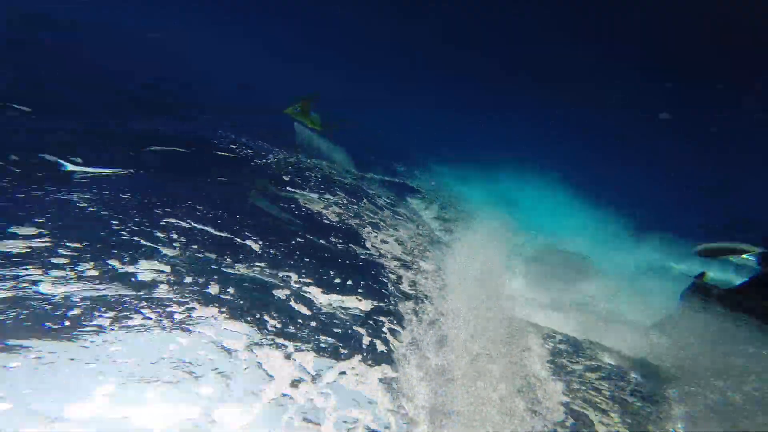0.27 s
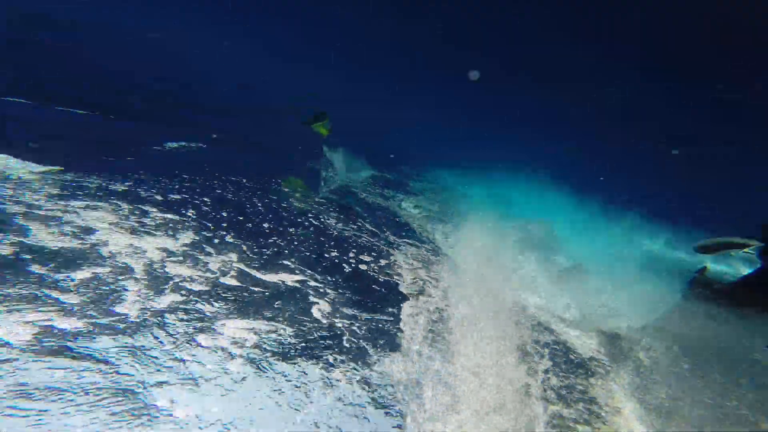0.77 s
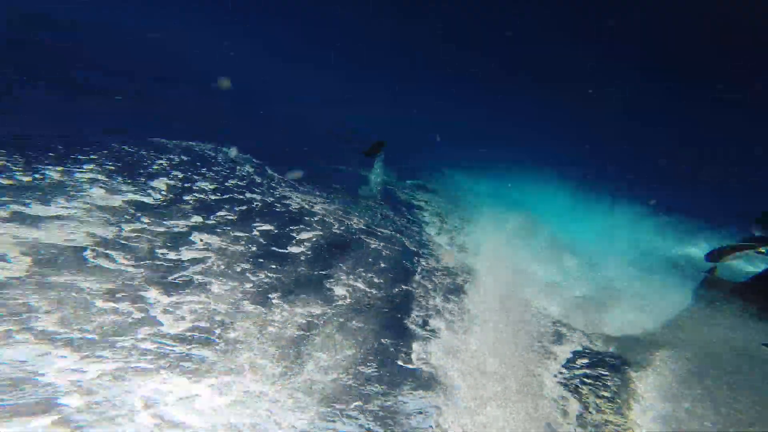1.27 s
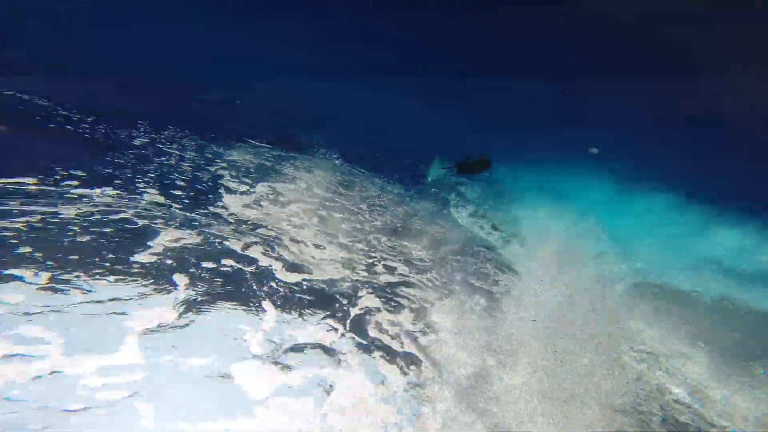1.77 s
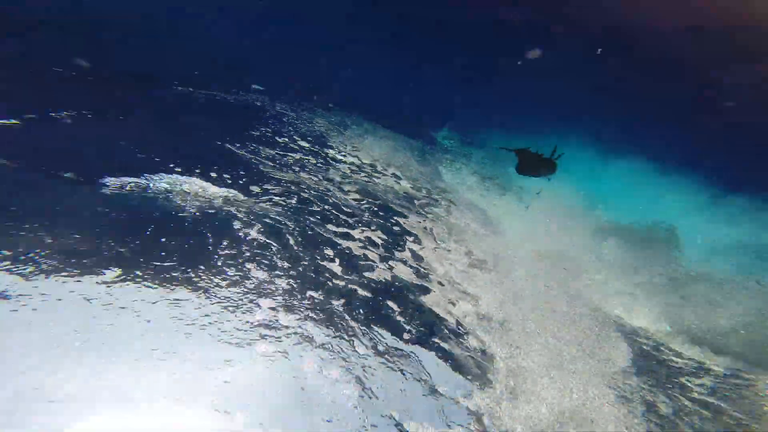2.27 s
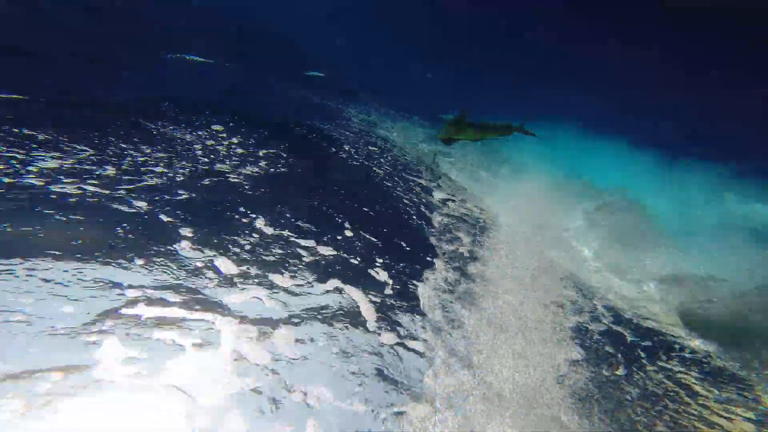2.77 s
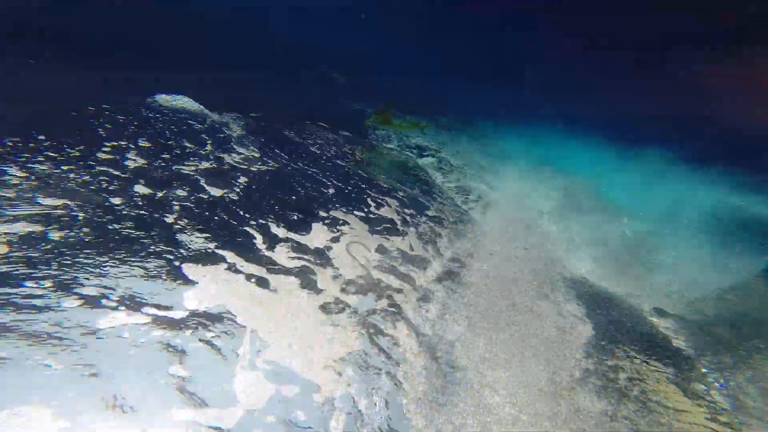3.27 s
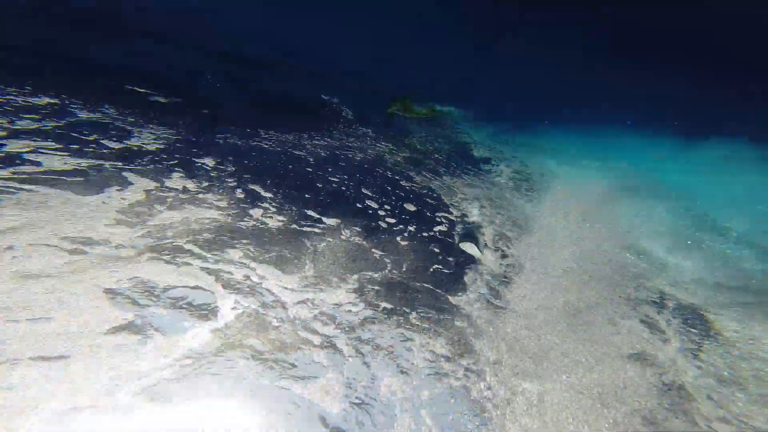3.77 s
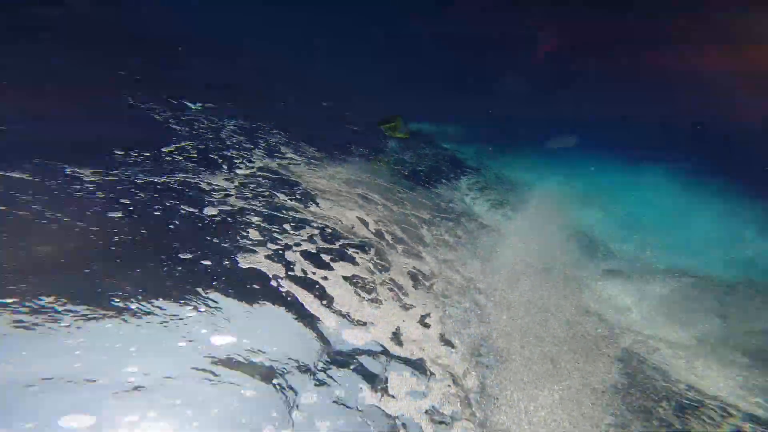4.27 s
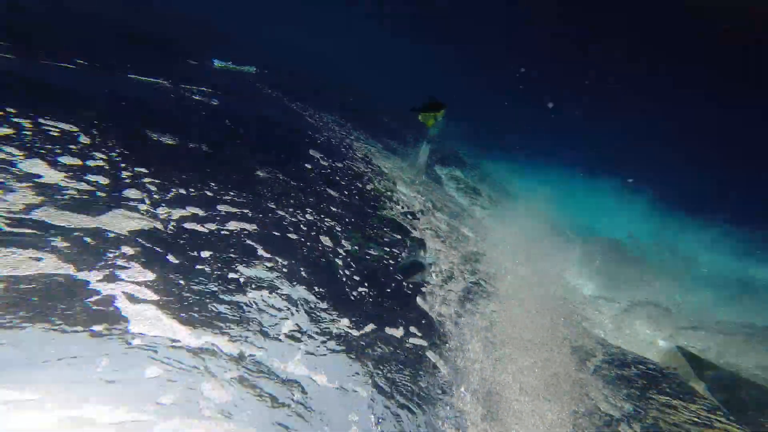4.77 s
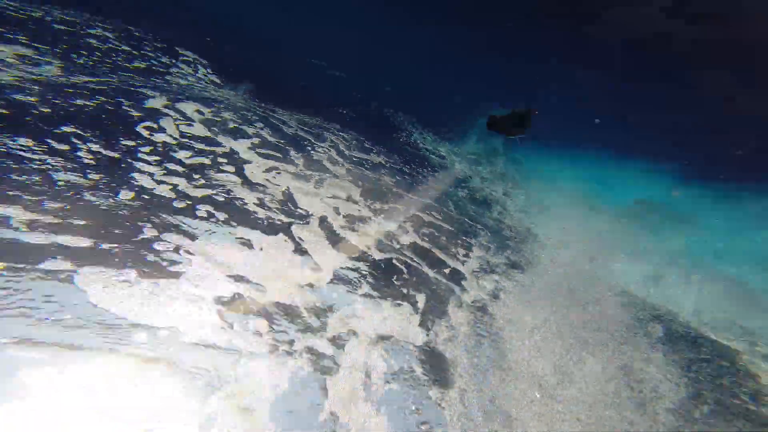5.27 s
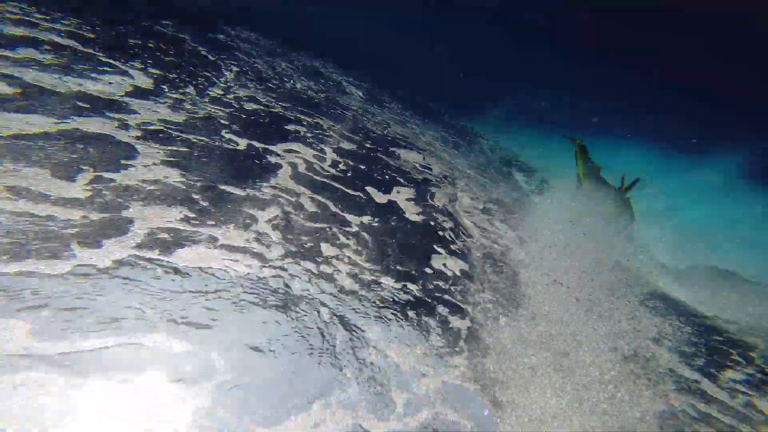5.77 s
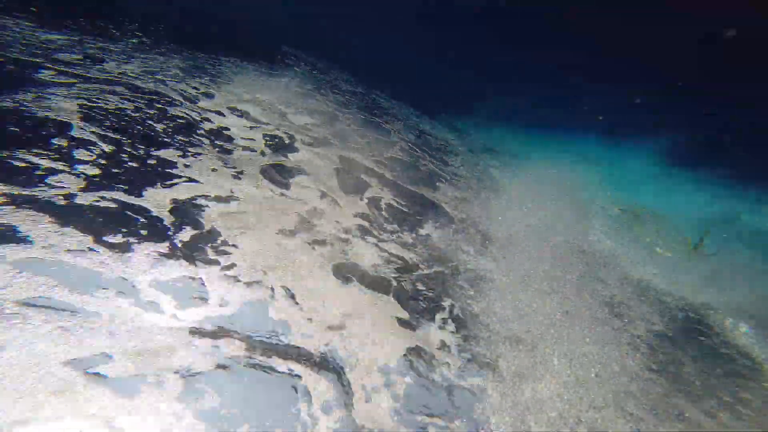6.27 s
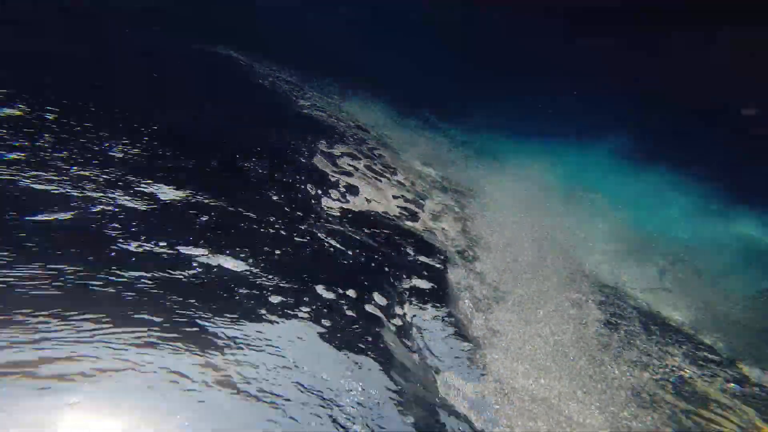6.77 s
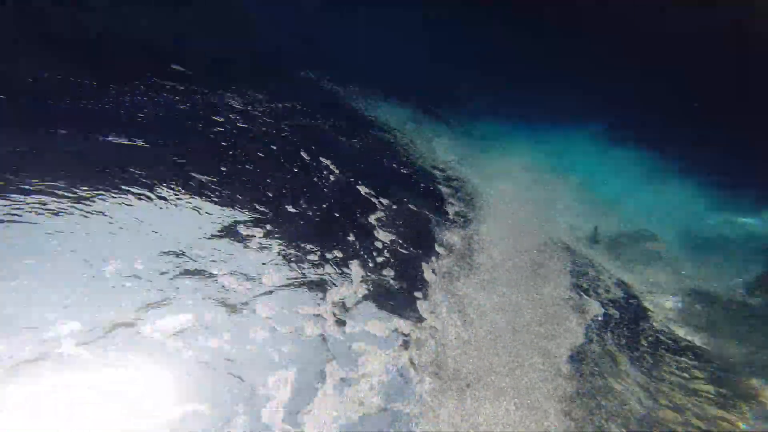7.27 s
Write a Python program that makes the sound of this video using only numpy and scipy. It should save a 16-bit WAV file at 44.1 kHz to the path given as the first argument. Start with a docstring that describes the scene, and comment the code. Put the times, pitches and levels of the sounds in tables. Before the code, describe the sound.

Muffled, bubbly wash from a moving boat rushes around a submerged camera on a pole, heard from inside its housing. Turbulence buffets and thumps the case as bubbles glug, pop and knock, with light metallic ticking from a loose fitting. An early rush of foam swells and drops away, then the pole's low, wavering throb strengthens and carries on beneath several smaller surges.

```python
"""Vortex shedding rocks a pole in the wake of a moving boat at a low, wavering rate.
The pole carries a camera in a sealed housing, which turbulent eddies buffet and thump.
Bubbly water, surging with foam, excites the air cavity and the walls of the housing:
it booms, patters, fizzes, pops and knocks. A loose fitting rattles in short bright
clusters as impacts excite its modes."""
import sys
import numpy as np
from scipy import signal
from scipy.fft import rfft, irfft, next_fast_len
from scipy.io import wavfile
from scipy.ndimage import map_coordinates

SR = 44100
rng = np.random.default_rng(int(sys.argv[2]) if len(sys.argv) > 2 else 0)


def store_wav(level_fs):
    """Save 16-bit WAV to argv[1]."""
    pcm = np.round(np.clip(np.atleast_2d(level_fs), -1, 1) * 32767)
    wavfile.write(sys.argv[1], SR, pcm.T.astype(np.int16))


N = 331191


def amp(db):
    """Amplitude ratio of a level in decibels."""
    return 10 ** (np.asarray(db) / 20)


def unit(x):
    """Normalisation to rms 1."""
    return x / np.sqrt(np.mean(x ** 2) + 1e-20)


def curves(rows):
    """Linear interpolation, per sample, of each column after the time."""
    times, *columns = np.transpose(rows)
    return [np.interp(np.arange(N) / SR, times, column) for column in columns]


def wobble(rate):
    """Random modulation: a spline through `rate` knots a second."""
    return map_coordinates(rng.standard_normal(int(N * rate / SR) + 4), [np.arange(N) * rate / SR])


def filtered(x, response):
    """Linear filtering: the spectrum times a frequency response."""
    size = next_fast_len(N + SR // 2)
    return irfft(rfft(x, size) * response(np.fft.rfftfreq(size, 1 / SR)), size)[:N]


def colour(points):
    """Response through (f/Hz, level/dB) points on a log axis."""
    f, db = np.transpose(points)
    return lambda hz: amp(np.interp(np.log(hz + 1), np.log(f + 1), db))


def resonances(modes):
    """Modal superposition: damped resonators of alternating sign."""
    return lambda f: sum((-1) ** k * amp(db) * 1j * f * width / (f0 * f0 - f * f + 1j * f * width)
                         for k, (f0, width, db) in enumerate(modes))


def muffled(x, hz):
    """Transmission loss: the housing wall takes the treble off."""
    return filtered(x, lambda f: 1 / (1 + 1j * f / hz) ** 4)


def impacts(per_second, spread_db):
    """Poisson process: impulses of either sign, a few far stronger than the rest."""
    hit = rng.random(N) < per_second / SR
    return hit * rng.standard_normal(N) * amp(spread_db * np.minimum(rng.exponential(size=N), 4))


def scrapes(per_second, spread_db, t60):
    """Exponential decay: each random contact leaves a dying burst of noise."""
    contacts = np.abs(impacts(per_second, spread_db))
    envelope = signal.lfilter([1], [1, -amp(-60 / (t60 * SR))], contacts)
    return unit(envelope * rng.standard_normal(N))


def rings(rows, attack, noisy=0):
    """Damped oscillation plus noise for each (t/s, level/dB, f/Hz, T60/s); f = 0 leaves only noise."""
    out, t = np.zeros(N + SR), np.arange(SR // 16) / SR
    for s, db, hz, t60 in rows:
        wave = np.sin(2 * np.pi * hz * t) + noisy * rng.standard_normal(len(t))
        envelope = amp(-60 * t / t60) * (1 - np.exp(-t / attack))
        out[round(s * SR):][:len(t)] += amp(db) * envelope / envelope.max() * wave
    return out[:N]


def bubbles(per_second, hz, octaves, cycles, spread_db, samples):
    """Bubble resonance: a swarm of damped tones, each rising a little in pitch."""
    when, tuning, rank = np.hsplit(rng.random((int(8 * per_second), 3)), 3)
    pitch = hz * 2 ** (octaves * (2 * tuning - 1))
    turns = pitch * np.arange(samples) / SR
    strength = amp(-spread_db * np.log(rank + 0.016))
    envelope = strength * np.exp(-turns / cycles) * (1 - np.exp(-turns / 0.31))
    wave = envelope * np.sin(2 * np.pi * turns * (1 + 0.012 * turns))
    at = (when * N).astype(int) + np.arange(samples)
    return unit(np.bincount(at.ravel(), wave.ravel())[:N])


# Vortices leaving the pole: t/s, f/Hz, level/dB
SHEDDING = [(0, 14.6, -21.5), (0.45, 11.7, -25.5), (0.7, 14, -47), (0.9, 12, -43), (1.35, 19.3, -26),
            (1.8, 23, -24), (2.05, 22, -16), (2.4, 24.7, -13), (2.8, 18.9, -11.5), (3.15, 17.7, -14.5),
            (3.45, 22, -15.5), (3.7, 21, -16.5), (3.9, 24.5, -11.5), (4.45, 18.1, -15.5), (4.8, 22, -12.5),
            (5.4, 28.8, -15.5), (5.75, 20.3, -12), (6.2, 25.4, -13), (6.55, 20.3, -13), (6.9, 20.7, -13),
            (7.5, 13.7, -13)]
# Partials of the rocking: harmonic number, level/dB
HARMONICS = [(1, 0.5), (2, -7), (3, -18), (4, -20)]
def rocking():
    """Vortex shedding: each vortex pushes quickly and lets go slowly, never quite in time."""
    hz, db = curves(SHEDDING)
    phase = 2 * np.pi * np.cumsum(hz * (1 + 0.1596 * wobble(18))) / SR
    wave = sum(amp(level + 4.4 * np.tanh(wobble(14))) * np.cos(k * phase + (k - 1) * np.pi / 4)
               for k, level in HARMONICS)
    return amp(db) * unit(wave)


# Eddy pressure spectrum: f/Hz, level/dB
EDDIES = [(5, -35.5), (9, -20), (25, -1), (50, -4), (100, -12), (200, -16.5), (300, -23.5), (450, -28),
          (900, -73), (4000, -150)]
# Strength of the eddies: t/s, level/dB
BUFFETING = [(0, -17), (1.2, -16), (1.75, -22), (1.95, -25), (2.35, -20), (2.8, -18), (3.55, -22),
             (4.7, -17.5), (5.1, -23.5), (5.4, -16.5), (5.7, -21), (6.3, -20.5), (6.7, -20.5), (7.5, -20.5)]
def buffet(lift_db):
    """Turbulent pressure fluctuation: eddies of all sizes strike in lumps."""
    db, = curves(BUFFETING)
    lumps = amp(0.95 * wobble(17) + 2.12 * wobble(40)) * rng.standard_normal(N)
    return amp(db + 0.37 * lift_db) * unit(filtered(lumps, colour(EDDIES)))


# Modes of the air in the housing: f/Hz, bandwidth/Hz, level/dB
CAVITY = [(522, 152, -1.5), (641.3, 123.5, 1), (777, 130, -3)]
def boom(gust, flurry):
    """Cavity resonance: foam drives the enclosed air while bubbles glug."""
    drive = amp(0.84 * gust + 2.7 * flurry) * impacts(2200, spread_db=3.0)
    air = unit(filtered(drive, lambda hz: resonances(CAVITY)(hz) ** 2))
    glugs = bubbles(90, hz=604, octaves=0.46, cycles=1.7, spread_db=2.5, samples=1500)
    return unit(air + muffled(amp(-7 + 1.5 * gust) * glugs, hz=2500))


# Response of the housing walls: f/Hz, level/dB
WALLS = [(300, -13), (700, -2), (900, -7), (1360, -2), (1500, -3.5), (1680, 1.5), (1960, -9), (2390, -5),
         (2820, -12.5), (3500, -15), (3720, -18), (3930, -28), (4200, -25.5), (4800, -30), (9000, -46),
         (13500, -105)]
def patter(gust, flurry, upper_db, lift_db):
    """Structure-borne sound: spray, small bubbles and splashes pass through the walls."""
    spray = amp(1.52 * flurry + 1.37 * wobble(45)) * unit(impacts(9000, spread_db=2.5))
    swarm = amp(-7.5) * bubbles(900, hz=1998, octaves=1.311, cycles=4.8, spread_db=4.0, samples=500)
    splashes = amp(-9 + 0.7 * lift_db) * scrapes(140, spread_db=2, t60=0.016)  # surges break coarser
    walls = unit(filtered(amp(0.79 * gust) * (spray + swarm + splashes), colour(WALLS)))
    upper_band = filtered(walls, lambda hz: 1 / (1 + (1900 / (hz + 1)) ** 8))
    return walls + (amp(upper_db) - 1) * upper_band


# Spectrum of the finest bubbles: f/Hz, level/dB
SIZZLE = [(6000, -50), (9000, -1), (11800, -4), (15000, -20)]
def fizz():
    """Incoherent summation: the finest bubbles merge into flurries of hiss."""
    flurries = amp(5 * wobble(12) + 2.5 * wobble(35))
    grains = rng.standard_normal(N) + amp(6) * scrapes(500, spread_db=4.5, t60=0.01)
    return unit(filtered(flurries * grains, colour(SIZZLE)))


# Foam in the passing water: t/s, patter level/dB, boom level/dB
FOAM = [(0.0, -25, -26.5), (0.5, -30, -26), (0.96, -25, -24), (1.65, -32, -28), (1.79, -39, -31),
        (2.02, -30, -30), (2.36, -28, -26), (2.6, -29.5, -30), (3.01, -31, -30.5), (3.32, -36.5, -33),
        (3.63, -35, -34), (3.8, -28, -27.5), (4.1, -31.5, -27.5), (4.5, -29.5, -28.5), (4.91, -29, -27.5),
        (5.3, -28, -28), (5.97, -33.5, -30.5), (6.2, -32, -28), (6.39, -34, -27.5), (6.56, -31.5, -29.5),
        (6.79, -31.5, -25.5), (7.16, -33.5, -30.5), (7.5, -32.5, -28.5)]
# Its treble: t/s, patter gain above 1900 Hz/dB, fizz level/dB
TREBLE = [(0, -2, -79), (0.9, 0.5, -74), (1.25, -0.5, -70), (1.75, -1.5, -71), (1.95, 4.5, -80),
          (2.1, -2.5, -84), (3.1, 1, -86), (3.5, 2.5, -87), (4.1, -1.5, -82), (4.6, 0, -70), (5.25, 0, -76),
          (5.9, 2, -84), (6.5, 0.5, -82), (7.5, -0.5, -86)]
def foam(lift_db):
    """Amplitude modulation: the same gusts of foam sway boom and patter, under a free-running fizz."""
    patter_db, boom_db = curves(FOAM)
    upper_db, fizz_db = curves(TREBLE)
    gust, flurry = wobble(22), wobble(60)
    return (amp(boom_db + 0.68 * lift_db) * boom(gust, flurry)
            + amp(patter_db + lift_db) * patter(gust, flurry, upper_db, lift_db)
            + amp(fizz_db) * fizz())


def fitting(drive, modes):
    """Forced vibration: the fitting's modes, confined to about 5200-9300 Hz."""
    band = lambda hz: np.clip(hz / 5200, 0, 1) ** 6 / (1 + (hz / 9300) ** 11)
    return filtered(drive, lambda hz: resonances(modes)(hz) * band(hz))


# Modes of the loose fitting: f/Hz, bandwidth/Hz, level/dB
FITTING_MODES = [(5510, 520, 0.5), (6890, 580, 0), (7900, 1400, -8)]
# Response of its thin edge: f/Hz, level/dB
EDGE = [(6000, -59), (8500, 2), (10300, 9), (11800, -4), (13000, -10), (15500, -22.5)]
# Strength of its chatter: t/s, level/dB
CHATTER = [(0.0, -53), (0.14, -45), (0.54, -52.5), (1.1, -48), (1.35, -52), (1.97, -54), (2.43, -54.5),
           (3.46, -58.5), (3.82, -56), (4.17, -60), (4.32, -47.5), (4.6, -50), (4.81, -54), (4.96, -61),
           (5.27, -46.5), (5.5, -51), (5.75, -55.5), (7.45, -61)]
def rattle(lift_db):
    """Impact excitation: clustered contacts sound all modes, the lowest alone, or the thin edge."""
    db, = curves(CHATTER)
    cluster = amp(3.6 * wobble(30))
    hiss = amp(-9.5 + 2.2 * wobble(25)) * rng.standard_normal(N)
    full_drive = scrapes(220 * cluster, spread_db=-1.0, t60=0.012) + hiss
    low_drive = amp(-4.5) * scrapes(80 * cluster, spread_db=3.5, t60=0.02)
    edge_drive = scrapes(260 * cluster, spread_db=4.5, t60=0.012) + amp(-10) * hiss
    body = unit(fitting(full_drive, FITTING_MODES) + fitting(low_drive, FITTING_MODES[:1]))
    edge = amp(-18.5) * unit(filtered(edge_drive, colour(EDGE)))
    return amp(db + 0.26 * lift_db - 3) * (body + edge)


# Dense clouds of foam: crest t/s, lift/dB, build time/s
SURGES = [(0.08, 1, .13), (0.619, 3.5, 0.073), (1.07, -0.5, 0.042), (1.415, 9, 0.069), (1.803, 13.5, 0.19),
          (3.165, 5.5, 0.1), (3.222, 5, 0.14), (3.79, 1, 0.14), (3.89, 4.5, 0.093), (4.635, 1.5, 0.0097),
          (4.681, 5, 0.019), (4.764, 4.5, 0.08), (5.727, 4, 0.12), (5.915, 5.5, 0.029)]
def surges(fall_s=0.0081, lull_depth=0.36, refill_s=0.035):
    """Advection: each passing cloud builds a lift in dB, then drops into a lull of clear water."""
    t = np.arange(N) / SR
    lift_db = np.zeros(N)
    for s, db, build_s in SURGES:
        offset = np.abs(t - s)
        crest = np.exp(-offset / np.where(t < s, build_s, fall_s))
        lull = (1 - crest) * (t > s) * np.exp(-offset / refill_s)
        lift_db += db * (crest - lull_depth * lull)
    return lift_db


# Short pops of small bubbles, and one low, short knock at 3.275 s: t/s, level/dB, f/Hz
POPS = [(0.0594, -20, 1590), (0.228, -10.5, 1280), (0.5468, -11.5, 1390), (0.592, -12, 1280),
        (0.959, -14, 3170), (0.973, -13, 4300), (1.036, -13, 2900), (1.0455, -7.5, 1250), (1.05, -10, 3200),
        (1.119, -13, 1710), (1.174, -20, 3940), (1.354, -9, 1190), (1.383, -11.5, 1750), (1.393, -15, 1700),
        (1.444, -13, 1510), (1.521, -13, 1200), (1.573, -14, 4120), (1.747, -12, 3200), (1.389, -18, 2970),
        (1.767, -10, 1690), (2.825, -10, 1670), (3.123, -13, 1590), (3.218, -14.5, 3390),
        (3.275, -7.5, 675), (3.774, -11, 1620), (3.879, -15, 1730), (4.618, -15, 1310), (4.651, -11, 1700),
        (4.689, -14.5, 2400), (4.728, -7.5, 1400), (5.7198, -18, 1598), (7.2724, -14, 1174)]
def pops():
    """Damped resonance: each is a brief tone with a spit of noise that weakens below 1500 Hz."""
    spits = [(s, db - 17 * np.clip(np.log2(1500 / hz), 0, 2), 0, 0.02) for s, db, hz in POPS]
    spit = rings(spits, attack=0.0012, noisy=0.67)
    tone = rings([(s, db, hz, 0.018) for s, db, hz in POPS], attack=0.00035)
    return muffled(muffled(tone + spit, hz=4930), hz=4430)


# Single strikes of the fitting: t/s, level/dB
TICKS = [(0.0628, -26.5), (0.3334, -29), (0.4509, -31), (0.5663, -30), (0.5996, -34), (0.6295, -41),
         (0.7473, -37), (0.7907, -30), (0.852, -31), (0.8735, -34), (0.9887, -24), (1.0466, -29),
         (1.1329, -31), (1.1728, -30), (1.2766, -32), (1.323, -27), (1.376, -31), (1.4826, -31),
         (1.541, -41), (1.56, -25), (1.7066, -40), (1.734, -29.5), (1.7859, -37), (2.162, -39),
         (2.2264, -35), (2.2548, -39), (2.2818, -34), (2.3111, -35), (2.3571, -35), (2.3781, -34),
         (2.5024, -31), (2.5935, -34), (2.8385, -39), (3.8591, -36), (3.9315, -32), (4.097, -35),
         (4.1206, -37), (4.165, -39), (4.186, -36), (4.2099, -34), (4.2343, -33), (4.2613, -32),
         (4.3371, -39), (4.404, -33), (4.4553, -25), (4.5095, -38), (4.5576, -32), (4.615, -24),
         (4.6629, -25), (4.745, -34), (4.759, -42), (4.809, -30.5), (4.843, -32), (4.944, -35),
         (4.9811, -32), (5.0276, -31.5), (5.1235, -36), (5.1991, -36), (5.245, -29), (5.3678, -43),
         (5.3866, -35), (5.4304, -27), (5.665, -33), (5.8242, -37), (6.0013, -48), (6.0971, -33.5),
         (6.1848, -35), (6.331, -38), (6.361, -38), (6.5449, -31), (6.6485, -39), (6.6648, -34),
         (6.8301, -37), (6.9312, -36), (7.0606, -39), (7.234, -35)]
def ticks(rebound_s=0.0096, rebound_db=-7.5, graze_db=-10.5):
    """Inelastic collision: after a faint graze the fitting strikes and rebounds twice."""
    contacts = []
    for s, db in TICKS:
        for k in range(-1, 3):  # graze, strike, two rebounds
            onset = s + k * rebound_s * rng.uniform(0.24, 1.2)
            level = db + abs(k) * rebound_db + (k < 0) * graze_db + (k != 0) * rng.normal(0, 3)
            contacts.append((onset, level, 0, 0.008))
    return fitting(rings(contacts, attack=0.00086, noisy=1.77), FITTING_MODES)


# Big bubbles: t/s, level/dB, f/Hz, relative slap level/dB, T60/s
KNOCKS = [(0.081, -10, 575, -11, 0.022), (0.473, -6.5, 616, -11, 0.027), (0.548, -14, 535, -16, 0.036),
          (0.594, -12.5, 596, -11, 0.033), (0.902, -10, 606, -13, 0.018), (1.045, -19, 760, -21, 0.026),
          (1.185, -7.5, 638, -23, 0.033), (1.215, -16, 681, -19, 0.029), (1.523, -11, 655, -7, 0.026),
          (1.714, -11, 600, -18, 0.03), (1.737, -8, 580, -4, 0.031), (1.774, -8, 610, -16, 0.017),
          (1.821, -11.5, 530, -15, 0.023), (1.964, -12.5, 600, -20, 0.026), (2.379, -6.5, 591, -14, 0.057),
          (2.41, -10.5, 668, -13, 0.048), (2.525, -16, 545, -17, 0.028), (2.57, -16, 616, -14, 0.033),
          (2.663, -9.5, 514, -19, 0.037), (2.722, -13, 520, -7, 0.026), (2.764, -15, 590, -18, 0.026),
          (2.833, -11, 596, -21, 0.051), (3.17, -16, 655, -19, 0.052), (3.685, -10.5, 586, -17, 0.023),
          (3.734, -11.5, 610, -16, 0.025), (4.044, -12.5, 553, -7, 0.024), (4.19, -16, 544, -16, 0.026),
          (4.246, -11, 642.5, -15, 0.02), (4.406, -13.5, 529.3, -16, 0.021), (4.741, -13, 702, -10, 0.025),
          (4.754, -12, 629, -15, 0.055), (5.309, -13.5, 626.6, -8, 0.047), (6.201, -13, 610, -15, 0.026),
          (6.293, -6, 540, -24, 0.023), (6.325, -10.5, 627, -18, 0.032), (6.351, -10.5, 635, -15, 0.03),
          (6.393, -14.5, 775, -13, 0.026), (6.419, -12, 624, -11, 0.026), (6.488, -10.5, 632, -15, 0.04),
          (6.509, -15.5, 702, -15, 0.026), (6.603, -18, 605, -11, 0.039), (6.637, -15, 558.6, -16, 0.033),
          (6.658, -16, 590, -16, 0.03), (6.72, -11, 555, -18, 0.026), (6.738, -5.5, 573.4, -23, 0.029),
          (6.817, -14, 602.6, -17, 0.026), (6.846, -8, 601, -18, 0.029), (6.957, -12, 604.6, -10, 0.051),
          (7.249, -9, 594, -20, 0.032)]
def knocks():
    """Transient excitation: a big bubble bursts with a tone, shakes the cavity and slaps the walls."""
    tone = rings([(s, db, hz, t60) for s, db, hz, _, t60 in KNOCKS], attack=0.00051)
    shake = rings([(s, db, 0, 2.3 * t60) for s, db, _, _, t60 in KNOCKS], attack=0.0008, noisy=1.43)
    slap = rings([(s, db + rel, 0, 0.022) for s, db, _, rel, _ in KNOCKS], attack=0.0014, noisy=3.4)
    return muffled(tone + filtered(shake, resonances(CAVITY)) + filtered(slap, colour(WALLS)), hz=3930)


# Pings of the fitting's edge: t/s, level/dB, f/Hz
PINGS = [(0.2299, -50, 8560), (0.2738, -33, 10240), (0.333, -32, 12000), (0.5332, -45, 8560),
         (0.631, -47, 9000), (0.8734, -49, 9470), (0.912, -46, 10300), (0.989, -33.5, 8500),
         (1.3753, -42.5, 8450), (1.402, -35, 10300), (1.5429, -53, 8640), (1.6444, -35.5, 9300),
         (1.8701, -55, 8520), (1.926, -47, 9610), (2.593, -35, 9374), (2.838, -44, 8600),
         (3.7778, -50, 8570), (3.908, -42, 8907), (4.4692, -45, 10000), (4.5141, -43, 8505),
         (4.6137, -39, 8900), (4.6463, -43, 10150), (5.1243, -42.5, 10420), (5.162, -41.5, 9310),
         (5.3373, -47, 8990), (6.0581, -47.5, 10150), (6.192, -39.5, 9175), (6.545, -44, 9690)]
def pings():
    """Free vibration: the thin edge rings high and dies at once."""
    ringing = rings([(s, db, hz, 0.007) for s, db, hz in PINGS], attack=0.0001, noisy=0.68)
    return filtered(ringing, lambda hz: np.clip(hz / 8000, 0, 1) ** 5 / (1 + (hz / 12800) ** 14))


# The biggest eddies: t/s, level/dB, f/Hz
THUMPS = [(0.453, -9, 146), (0.599, -12.5, 150), (.612, -2, 125), (0.775, -5, 102), (1.064, -1, 177),
          (1.335, -6.5, 187), (1.8087, -7, 36), (1.8184, -1.5, 230), (3.151, -6, 124), (3.981, -6.5, 101.5),
          (5.953, -9, 113), (6.295, -7.5, 260.4), (6.431, -11.5, 262), (7.429, -8, 98.8)]
def thumps():
    """Pressure transients: big eddies thump the housing, suction first."""
    return -rings([(s, db, hz, 0.027 + 1.6 / hz) for s, db, hz in THUMPS], attack=0.0003)


def scene():
    """Superposition at one microphone; surges lift the buffeting, boom, patter and rattle."""
    lift_db = surges()
    continuous = rocking() + buffet(lift_db) + foam(lift_db) + rattle(lift_db)
    return (continuous + pops() + ticks() + knocks() + pings() + thumps())[None]


def record(dry):
    """Saturation and band limiting: peaks round off softly and the highest treble is cut."""
    ceiling, top_hz = 0.9, 15700
    soft = dry[0] / (1 + np.abs(dry[0] / ceiling) ** 6) ** (1 / 6)
    return filtered(soft, lambda hz: hz < top_hz)[None]


dry = scene()
out = record(dry)
store_wav(out)
```